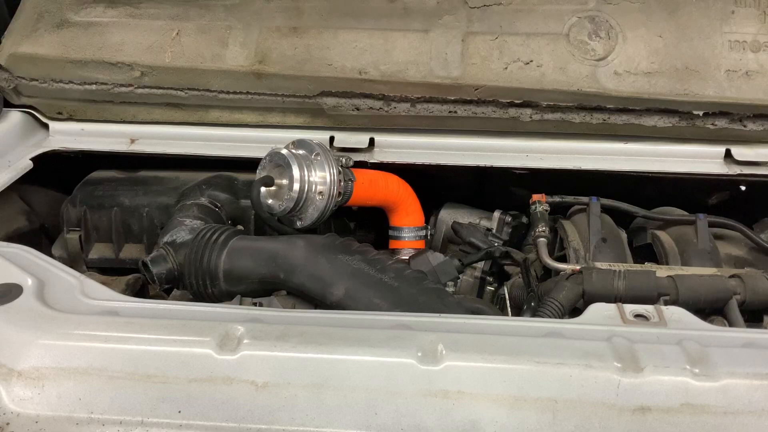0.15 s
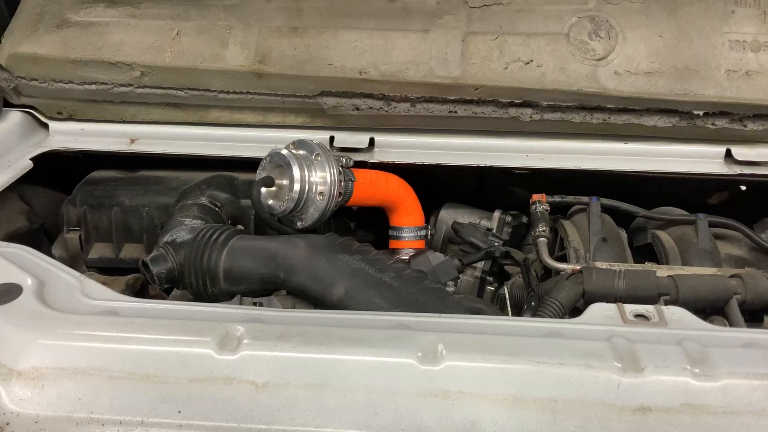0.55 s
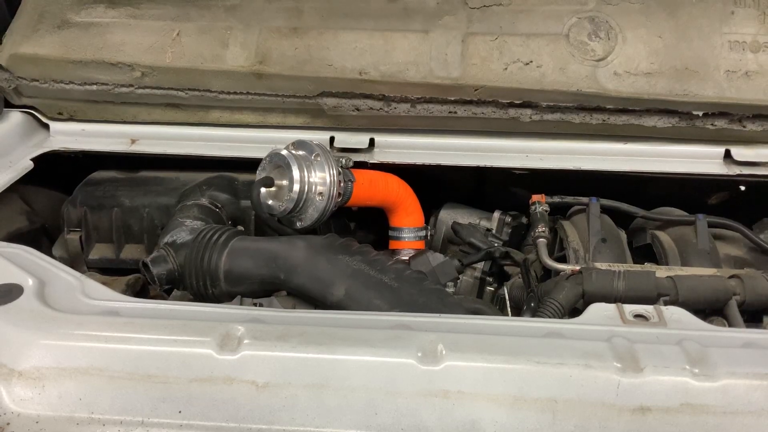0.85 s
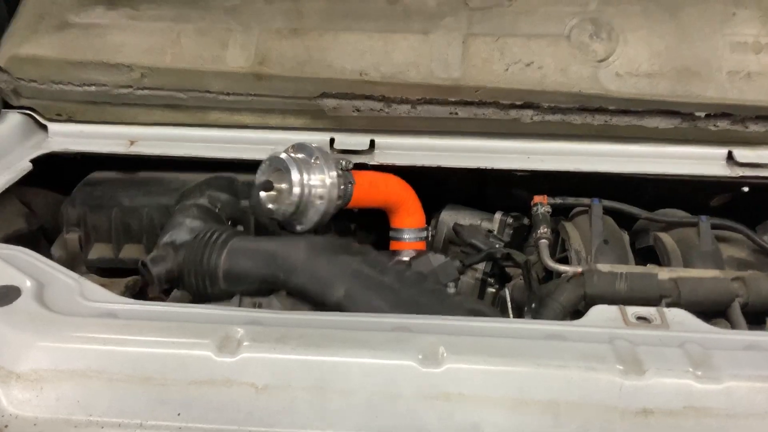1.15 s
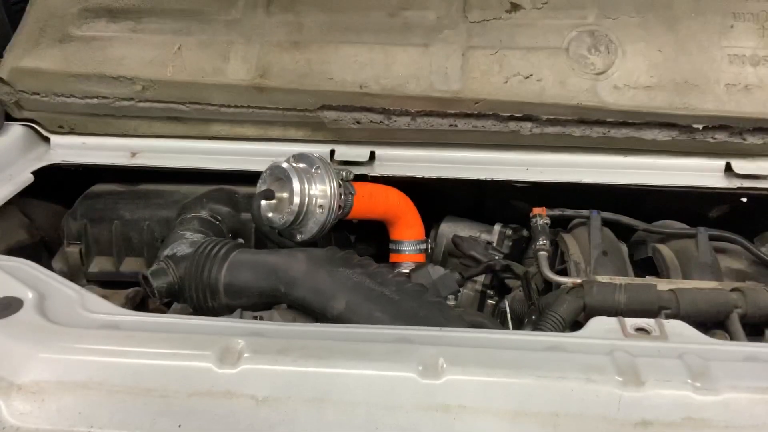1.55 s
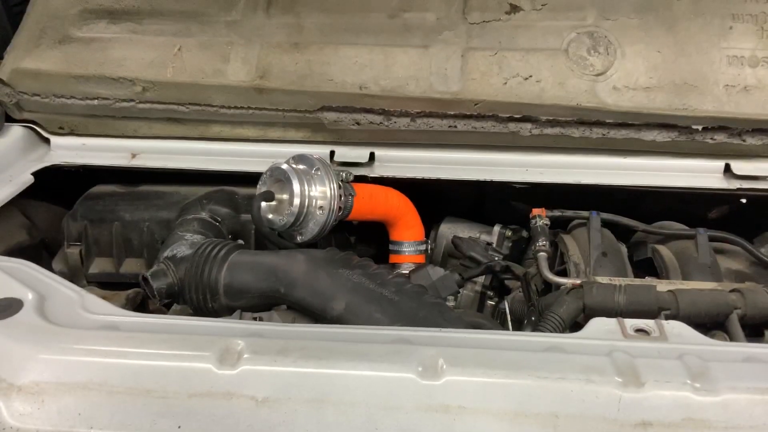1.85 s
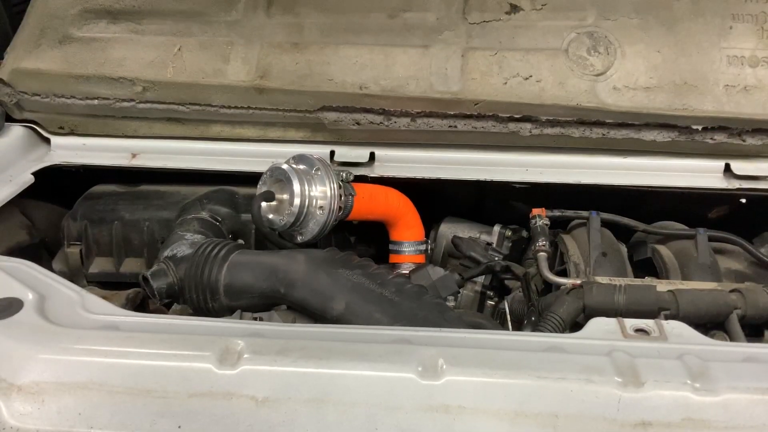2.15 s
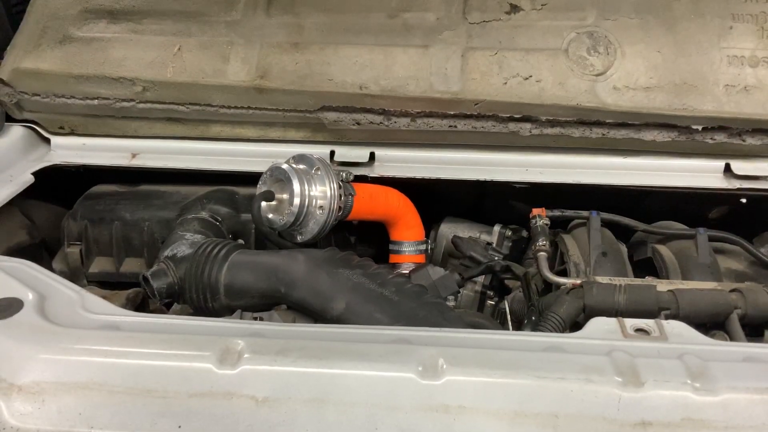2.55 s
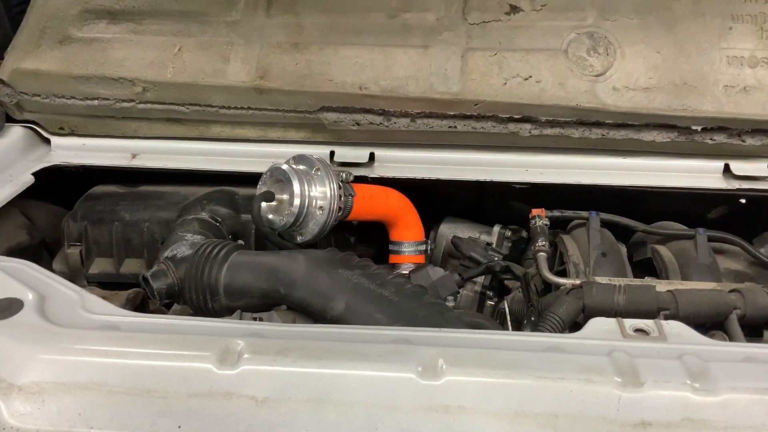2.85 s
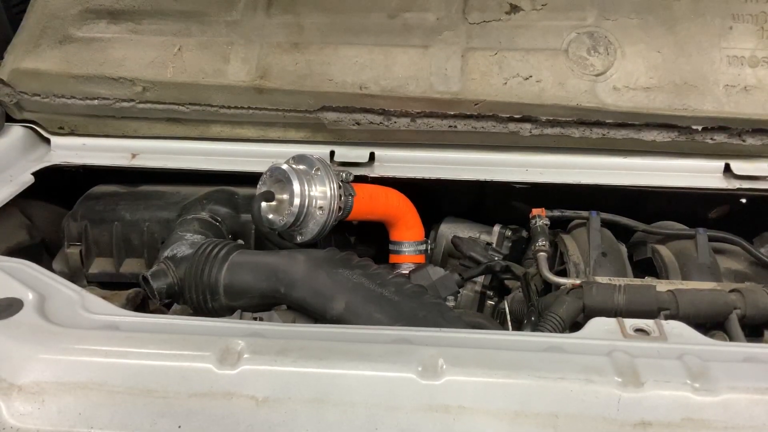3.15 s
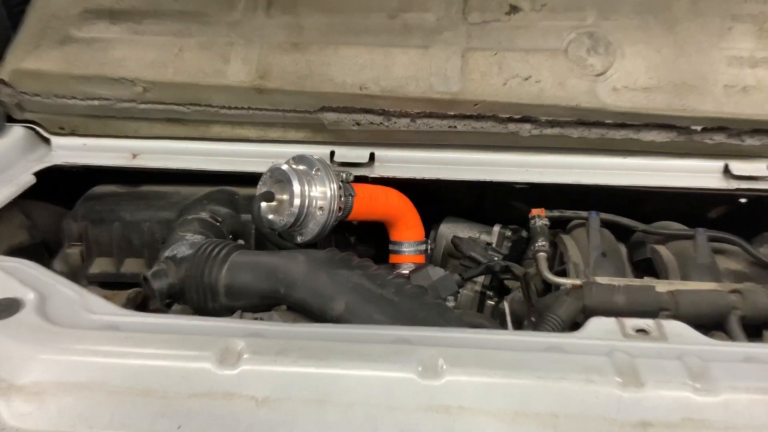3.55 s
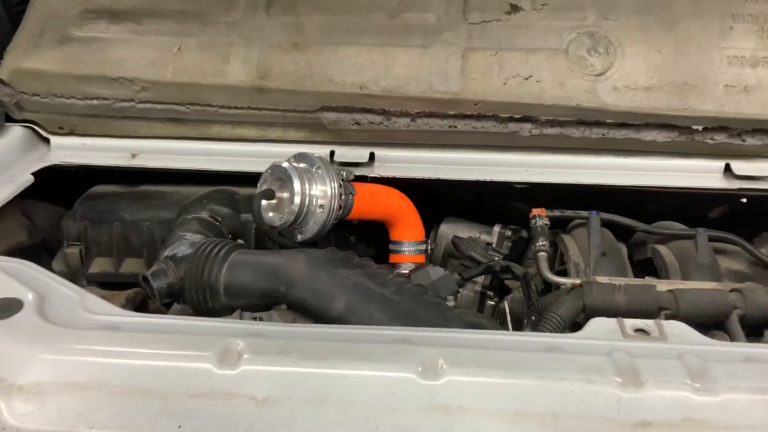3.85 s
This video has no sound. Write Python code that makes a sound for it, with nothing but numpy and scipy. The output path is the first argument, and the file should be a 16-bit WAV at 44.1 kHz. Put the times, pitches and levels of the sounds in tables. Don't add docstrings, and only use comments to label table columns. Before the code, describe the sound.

A car engine cranks, starts, idles briefly, then is revved hard with a blow-off hiss.

```python
import sys
import numpy as np
from scipy import signal
from scipy.fft import rfft, irfft
from scipy.io import wavfile
from scipy.ndimage import uniform_filter1d, minimum_filter1d

SR = 44100
rng = np.random.default_rng(int(sys.argv[2]) if len(sys.argv) > 2 else 0)


def generate_wav(sig):
    pcm = np.round(np.clip(np.atleast_2d(sig).T, -1, 1) * 32767).astype(np.int16)
    wavfile.write(sys.argv[1], SR, pcm)


def gain_from_db(level_db):
    decades = np.asarray(level_db, float) / 20
    return 10 ** decades


N = 176400
t = np.arange(N) / SR
freq = np.fft.rfftfreq(N, 1 / SR) + 1

# time in seconds, firings per second in Hz, exhaust pulse in dB,
# load in dB, open-throttle bark in dB.
ENGINE_RUN = [(1.1, 15.8, -13.5, -42, -34), (1.2, 24, -8, -29.5, -31), (1.31, 32, -11, -29, -22),
              (1.45, 35.7, -10, -32.5, -32), (1.7, 31.7, -11, -36.5, -50), (2.3, 33, -10.5, -36.5, -76),
              (2.8, 32, -10.5, -36.5, -71), (3.04, 33.7, -11.5, -37, -51), (3.2, 38.5, -10, -33.5, -41),
              (3.3, 47, -11.5, -30, -18), (3.42, 60.2, -14.5, -24, -14), (3.55, 81, -24, -21, -15),
              (3.63, 95, -23.5, -20, -16.5), (3.7, 100, -16.5, -20.5, -18), (3.77, 95, -28.5, -17, -34),
              (3.84, 100, -26, -31, -56), (4.0, 82, -17.5, -25.5, -44)]
CATCHES_S, LIFT_S = 1.128, 3.71
SCATTER_DB, LIFT_SCATTER_DB = .35, 5
# frequency in Hz, level in dB.
PIPE_COLOUR = [(20, -46), (34, -24), (64, -5), (100, 0), (135, -4), (168, -10), (215, -23), (600, -150)]
PIPE_ECHO_S, PIPE_ECHO_DB = .018, -17
# frequency in Hz, width in Hz, level in dB.
PIPE_MODES = [(200, 30, -33), (288, 45, -14)]
# time in seconds, level in dB.
SILENCER_RETURN = [(1.1, -24), (1.27, -20), (1.33, -24), (1.45, -19), (1.75, -33), (3.0, -31), (3.25, -21),
                   (3.45, -29), (3.6, -33)]
SILENCER_LATE_S = .0143
# frequency in Hz, width in Hz, level in dB.
BARK_MODES = [(102, 20.7, -8), (138.3, 36, 1), (210, 20, -8.5), (299, 53, -2.5), (424, 43, -9.5),
              (680, 83, -10)]
# time in seconds, level in dB.
AFTERFIRE = [(3.7385, -12), (3.7524, -20), (3.7677, -10.5), (3.7824, -14), (3.802, -13.5), (3.861, -10),
             (3.912, -12), (3.993, -12)]
# time in seconds, level in dB.
CRANK_PUFFS = [
    (0.459, -36),
    (0.755, -18.5),
    (0.897, -19),
    (1.032, -18.5),
]
# frequency in Hz, width in Hz, level in dB.
CRANK_PUFF_MODES = [(64, 14, 7.5), (108, 33, -16.5)]
# frequency in Hz, level in dB.
GAS_COLOUR = [(30, -6), (60, 0.5), (200, -4.5), (260, -5), (345, 2), (480, -16.5), (750, -20), (1500, -55)]
GAS_DB, GAS_PER_LOAD = -34.5, .55
# frequency in Hz, level in dB.
BLOCK_COLOUR = [(300, 6), (700, 6), (1100, 0.5), (2000, 4), (3000, -2), (6000, -4), (10000, -2),
                (16000, -11)]
# frequency in Hz, width in Hz, boost in dB.
BAY_MODES = [(471, 64, 6.5), (866, 100, -5.5), (980, 68, 7), (1150, 170, 9.5), (1420, 71, -1),
             (1525, 34, 5.5), (2260, 330, 1.5), (2840, 27, 4), (4140, 62, 5)]
# frequency in Hz, level in dB.
INTAKE_COLOUR = [(1500, -28), (4000, -12.5), (7000, -6), (11000, -1), (15000, 5.5), (16000, 5.5)]
INTAKE_DB, INTAKE_PER_LOAD = -33.5, 0.51
INTAKE_LATE_S, INTAKE_DECAY_S = 0.0058, 0.0071
# frequency in Hz, level in dB.
HUM_LINES = [(1888, -57)]

# frequency in Hz, level in dB.
BLOW_OFF_COLOUR = [(2000, -8), (3800, -10), (4500, -3), (5300, -6.5), (9000, -0.5), (11500, 5),
                   (16000, -1.5)]
BLOW_OFF_S, BLOW_OFF_DB, BLOW_RISE_S, BLOW_FADE_DB_S = 3.785, -10, 0.011, 24
LEAK_S, LEAK_DB, FLUTTER_DB = 3.68, -7, -21

# time in seconds, gear teeth per second in Hz, level in dB.
STARTER_RUN = [(.51, 259.6, -31.5), (.55, 282.5, -16), (.59, 303.4, -21.5), (.635, 328.2, -23.5),
               (.67, 310.8, -24.5), (.73, 500, -22.5), (.8, 503.8, -23.5), (1.1, 490, -21),
               (1.31, 513, -18.5), (1.39, 485, -36)]
LURCH_DB, LURCH_LATE_S, LURCH_S, LURCH_SAG = 4, .031, .017, .12
# frequency in Hz, level in dB.
GRIND_COLOUR = [(200, -7), (600, -4), (1200, 1), (2200, 0), (3500, -2.5), (6000, -9), (10000, -14.5),
                (16000, -17.5)]
# frequency in Hz, width in Hz, level in dB.
HOUSING_MODES = [(321, 100, 4), (490, 126, -1.5), (658, 27, -4.5), (1166, 330, -9.5), (1470, 240, -3)]
TEETH_DB = -6.5
# time in seconds, level in dB, half length in seconds.
PINION_BITES = [
    (0.551, 10, 0.01),
    (0.589, 6.5, 0.01),
    (0.64, 8, 0.022),
]
# time in seconds, half length in seconds, frequency in Hz, glide in Hz per second,
# level in dB.
GEAR_WHINE = [(.545, .02, 1525, 0, -4), (0.557, 0.045, 2044, -500, -10), (0.624, 0.038, 1400, 0, 3),
              (0.753, .04, 2980, -600, -7), (.795, 0.027, 1520, 0, -1), (1.066, 0.039, 1575, 2500, -9),
              (1.121, .03, 1740, 2000, -6), (1.256, 0.05, 2300, 2000, -8), (.55, .04, 186, 300, -6),
              (1.149, 0.024, 1110, 2, -8), (1.301, 0.07, 968, 300, -5.5)]
WHINE_ROUGH_RAD = 1.2
FREEWHEEL_HZ, FREEWHEEL_DB = 2135, -26

# time in seconds, level in dB, decay in seconds, brightness in dB.
KNOCK_HITS = [
    (.118, -44, 0.026, 0),
    (0.224, -36, 0.0092, 4),
    (0.457, -35, 0.032, -14),
    (0.516, -15.5, 0.024, -1),
    (0.53, -10.5, 0.015, 0.5),
    (0.548, -18.5, 0.028, -2),
    (1.299, -22.5, 0.039, 5),
]
RELAY_S, RELAY_HZ, RELAY_DB, RELAY_LEN_S = 0.303, 316, -43, .014

# start in seconds, end in seconds, level in dB.
PUMP_RUNS = [
    (0.032, 0.356, -35.5),
    (.68, 1.057, -37.5),
]
# frequency in Hz, width in Hz, level in dB.
PUMP_MODES = [(12350, 390, 3), (11500, 850, -10.5), (14400, 1200, -24), (1480, 150, -6), (4200, 310, -11.5),
              (7800, 15600, -10.5), (1540, 2700, -12)]
# frequency in Hz, level in dB.
FLOOR_COLOUR = [(30, -24), (70, -18), (130, -5.5), (300, -15), (600, -24), (1200, -23.5), (2200, -38),
                (8000, -40), (16000, -39)]
FLOOR_DB, STARTS_S = -51.5, .037
KEY_S, KEY_DB = 0.453, 8.5

# frequency in Hz, likeness from 0 to 1, extra left lag in radians,
# left minus right in dB.
PHONE_PORTS = [(60, .998, -.38, -1), (330, .9, -1.8, -3.5), (700, .45, -2.2, -6), (2400, .6, -1.7, -1.8),
               (4300, .55, .2, -1), (6100, .97, 3.14, -.6), (8300, .65, 3.6, -.3), (9700, 1, 3.14, 0)]
WIDEN_LAG, WIDEN_CROSS, WIDEN_FROM_HZ = 29, .54, 4500
TOP_HZ, LIMIT = 15720, .96


def unit(x):
    return x / np.sqrt(np.mean(x ** 2))


def curve(table, at=None, axis=1):
    a = np.array(table, float)
    if at is None:
        return np.interp(t, a[:, 0], a[:, axis])
    return np.interp(np.log(at), np.log(a[:, 0]), a[:, axis])


def colour(table):
    return gain_from_db(curve(table, freq))


def ring(modes):
    return sum(gain_from_db(db) / (1 + 1j * (freq ** 2 - hz ** 2) / (freq * width)) for hz, width, db in modes)


def bay(table):
    boost = sum(db / (1 + (2 * (freq - hz) / width) ** 2) for hz, width, db in BAY_MODES)
    return gain_from_db(curve(table, freq) + boost)


def delay(seconds):
    return np.exp(-2j * np.pi * freq * seconds)


def through(x, response):
    return irfft(rfft(x) * response, N)


def air(response):
    return unit(through(rng.standard_normal((3, N)), response))


def walk(rate):
    k = int(SR / rate)
    steps = np.repeat(rng.standard_normal(N // k + 1), k)
    return 1.3 * uniform_filter1d(uniform_filter1d(steps, k), k)[:N]


def clicks(table):
    x = np.zeros(N)
    x[[int(row[0] * SR) for row in table]] = gain_from_db([row[1] for row in table])
    return x


def pulses(hz, start_s, scatter_db):
    on = t >= start_s
    turns = np.floor(np.cumsum(hz * on) / SR + on).astype(int)
    return np.diff(turns, prepend=0) * gain_from_db(scatter_db * rng.standard_normal(N)[turns])


def fade(start_s, rise_s, decay_s):
    d = np.maximum(t - start_s, 0)
    return (1 - np.exp(-d / rise_s)) * np.exp(-d / decay_s)


def swell(middle_s, half_s):
    return np.exp(-((t - middle_s) / half_s) ** 2)


def exhaust(fire):
    low = (freq / 40) ** 2
    steep = low / (1 + low) / (1 + (freq / 335) ** 10)
    echo = 1 - gain_from_db(PIPE_ECHO_DB) * delay(PIPE_ECHO_S)
    pipe = colour(PIPE_COLOUR) * echo - ring(PIPE_MODES) * steep
    thump = through(fire * gain_from_db(curve(ENGINE_RUN, axis=2)) + clicks(AFTERFIRE), pipe)
    puff_tone = ring(CRANK_PUFF_MODES) * steep / (1 + (freq / 160) ** 4)
    cranking = through(clicks(CRANK_PUFFS), puff_tone)
    bark_tone = sum(np.abs(ring([mode])) ** 2 for mode in BARK_MODES) * freq ** 2 / (freq ** 2 + 40 ** 2)
    bark = through(fire * gain_from_db(curve(ENGINE_RUN, axis=4)) + 0.091 * clicks(AFTERFIRE), bark_tone)
    returned = through(fire * gain_from_db(curve(SILENCER_RETURN)), pipe * delay(SILENCER_LATE_S))
    return 490 * (thump + bark + returned) + 520 * cranking


def intake_puffs(fire):
    gulp = fade(INTAKE_LATE_S, 0.0025, INTAKE_DECAY_S)[:4000]
    puff = signal.fftconvolve(fire * gain_from_db(1.6 * rng.standard_normal(N)), gulp)[:N]
    return puff / (uniform_filter1d(puff, size=4000) + 0.035)


def rev_roar():
    tone = ring([(334, 180, -1.5), (500, 88, -1), (744, 120, -3.5)]) ** 2
    shape = swell(3.58, 0.045) + 0.55 * swell(3.44, 0.15)
    return air(tone) * gain_from_db(-25 + 2.7 * walk(50)) * shape


def engine():
    scatter = np.where(t < LIFT_S, SCATTER_DB, LIFT_SCATTER_DB)
    fire = pulses(curve(ENGINE_RUN) * (1 + .004 * walk(11)), CATCHES_S, scatter)
    load = curve(ENGINE_RUN, axis=3) + 41
    on = np.clip((t - CATCHES_S) / 0.055 + 1, 0, 1)
    puff = intake_puffs(fire)
    gas = air(colour(GAS_COLOUR)) * gain_from_db(GAS_DB + GAS_PER_LOAD * load + 0.61 * walk(9.18))
    gas = gas * (0.67 + 0.38 * puff)
    block = air(bay(BLOCK_COLOUR)) * gain_from_db(load - 36.5 + 0.44 * walk(8.2)) * (0.64 + 0.13 * puff)
    intake = air(colour(INTAKE_COLOUR)) * gain_from_db(INTAKE_DB + INTAKE_PER_LOAD * load) * (0.12 + 0.83 * puff)
    hums = sum(gain_from_db(db + 4.5) * np.sin(2 * np.pi * hz * t) for hz, db in HUM_LINES)
    return exhaust(fire) + on * (gas + rev_roar() + block + intake + hums)


def blow_off():
    decay_s = 20 / np.log(10) / BLOW_FADE_DB_S
    shape = fade(BLOW_OFF_S, BLOW_RISE_S, decay_s) + gain_from_db(LEAK_DB) * fade(LEAK_S, .05, .2)
    hiss = air(colour(BLOW_OFF_COLOUR)) * shape * gain_from_db(BLOW_OFF_DB + 1.5 * walk(40))
    flutter = air(ring([(1098, 98, 7), (2300, 240, -12)])) * fade(LEAK_S + 0.016, 0.017, .12)
    return hiss + flutter * gain_from_db(FLUTTER_DB + 2.5 * walk(60))


def gear_whine():
    whine = np.zeros(N)
    for s, half_s, hz, glide, db in GEAR_WHINE:
        phase = 2 * np.pi * (hz + glide * (t - s) / 2) * (t - s) + WHINE_ROUGH_RAD * walk(200)
        whine += gain_from_db(db + 3 * walk(40)) * swell(s, half_s) * np.sin(phase)
    return whine


def starter():
    late = [(t - s - LURCH_LATE_S) / LURCH_S for s, _ in CRANK_PUFFS[1:]]
    lurch = sum(np.exp(-u ** 2) for u in late)
    sag = sum(u * np.exp(-u ** 2 / 4) for u in late)
    on = (t > STARTER_RUN[0][0]) * np.clip((STARTER_RUN[-1][0] + 0.043 - t) / .05, 0, 1)
    on = on * gain_from_db(curve(STARTER_RUN, axis=2))
    meshing = pulses(curve(STARTER_RUN) * (1 - LURCH_SAG * sag + .03 * walk(150)), 0, 3.5)
    teeth = unit(through(meshing, ring(HOUSING_MODES) / (1 + (freq / 2500) ** 4)))
    bites = sum(gain_from_db(db) * swell(s, half_s) for s, db, half_s in PINION_BITES)
    teeth = teeth * gain_from_db(TEETH_DB + 1.4 * walk(30.15)) * (lurch * gain_from_db(LURCH_DB) + gain_from_db(-10.5) + bites)
    grind = air(bay(GRIND_COLOUR)) * gain_from_db(.6 * LURCH_DB * lurch + 1.2 * walk(40))
    free = air(ring([(FREEWHEEL_HZ, 45, 0)])) * gain_from_db(FREEWHEEL_DB) * swell(1.28, 0.083)
    spin_shape = np.clip((t - 1.07) / 0.018, 0, 1) * np.clip((1.37 - t) / 0.083, 0, 1)
    spin = air(colour(INTAKE_COLOUR)) * gain_from_db(-20.5) * spin_shape
    return on * (grind + teeth + gear_whine()) + free + spin


def knocks():
    dull = air(bay([(100, -17.0), (300, 4.5), (480, -3.0), (700, 0.5), (1300, -7.5), (3000, -27),
                    (16000, -56)]))
    bright = air(bay([(1000, -15), (4000, 1.0), (16000, -2)]))
    hits = sum(gain_from_db(db) * fade(s, 0.004, decay_s) * (dull + gain_from_db(bright_db) * bright)
               for s, db, decay_s, bright_db in KNOCK_HITS)
    relay = gain_from_db(RELAY_DB + 3) * np.sin(2 * np.pi * RELAY_HZ * t) * swell(RELAY_S, RELAY_LEN_S)
    return hits + relay


def pump():
    runs = sum(gain_from_db(db) * (t > start) * np.clip((end - t) / 0.038 + 1, 0, 1) for start, end, db in PUMP_RUNS)
    return air(ring(PUMP_MODES) ** 2) * runs * gain_from_db(2.0 * walk(30.0))


def background():
    level_db = FLOOR_DB + KEY_DB * swell(KEY_S, 0.11) - 10 * (t > .56) + 2.0 * walk(10.8)
    return air(colour(FLOOR_COLOUR)) * gain_from_db(level_db)


def scene():
    a, b, c = rfft(engine() + blow_off() + starter() + knocks() + pump() + background())
    late = delay(WIDEN_LAG / SR)
    cross = WIDEN_CROSS / (1 + (WIDEN_FROM_HZ / freq) ** 6)
    norm = 1 / np.sqrt(1 + cross ** 2)
    like = np.clip(curve(PHONE_PORTS, freq), 0, 1)
    turn = np.exp(-1j * curve(PHONE_PORTS, freq, axis=2))
    pan = gain_from_db(curve(PHONE_PORTS, freq, axis=3) / 2)
    same = (late * a + cross * b) * turn * norm
    left = like * same + np.sqrt(1 - like ** 2) * c * late * turn
    right = (a + cross * late * b) * norm
    return irfft(np.array([left * pan, right / pan]), N) * (t > STARTS_S)


def low_pass(x):
    return signal.sosfilt(signal.butter(12, 15730, fs=SR, output="sos"), x)


def record(dry):
    x = signal.sosfilt(signal.ellip(10, .2, 60, TOP_HZ, fs=SR, output="sos"), dry)
    peak = np.abs(x).max(axis=0)
    room = minimum_filter1d(LIMIT / np.maximum(peak, LIMIT), size=1801)
    mix = x * uniform_filter1d(room, size=1800)
    return low_pass(mix)


dry = scene()
out = record(dry)
generate_wav(out)
```